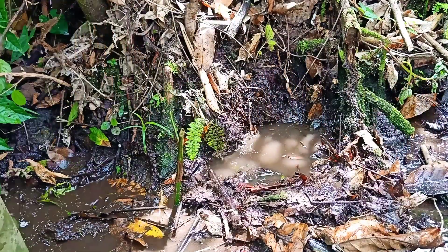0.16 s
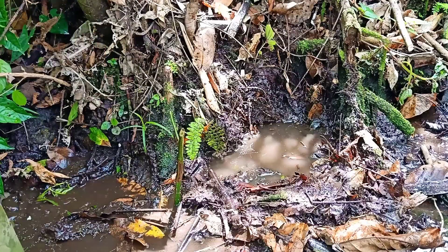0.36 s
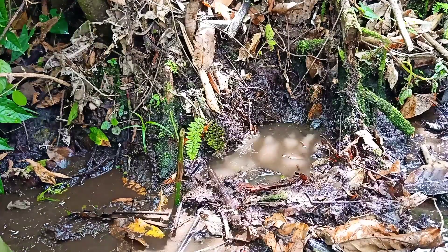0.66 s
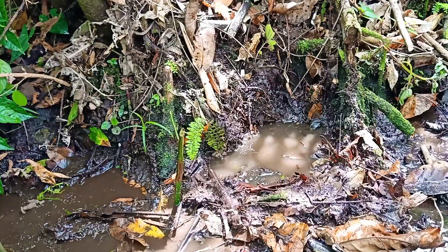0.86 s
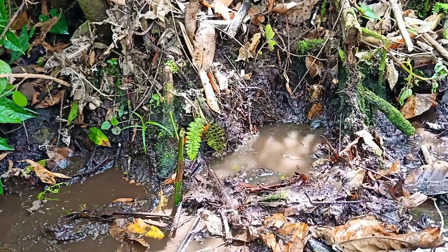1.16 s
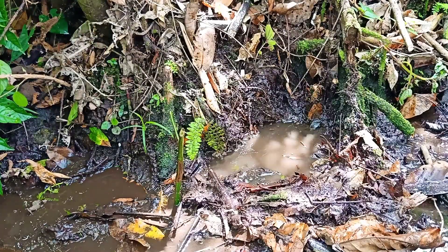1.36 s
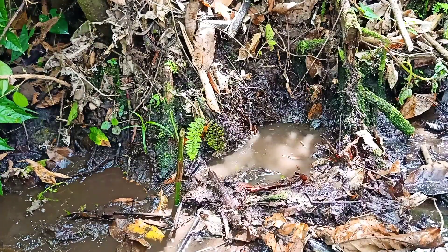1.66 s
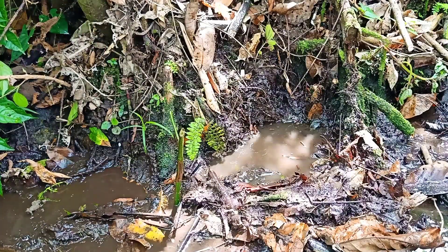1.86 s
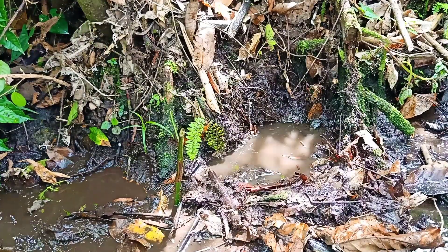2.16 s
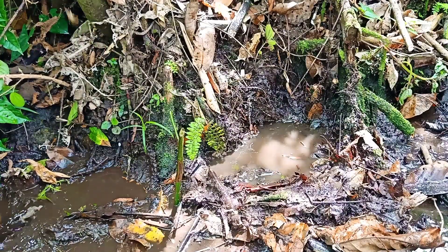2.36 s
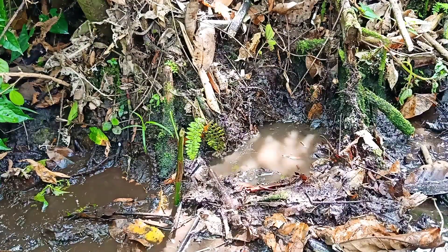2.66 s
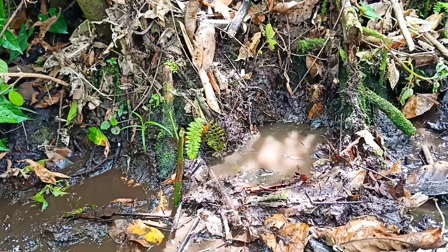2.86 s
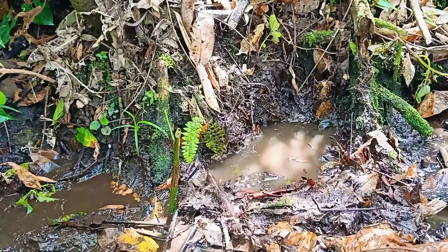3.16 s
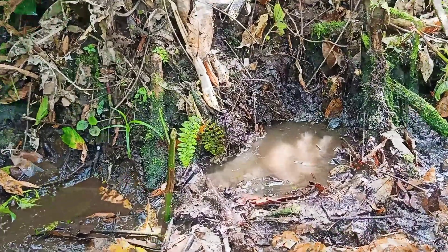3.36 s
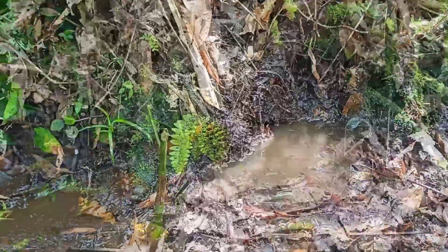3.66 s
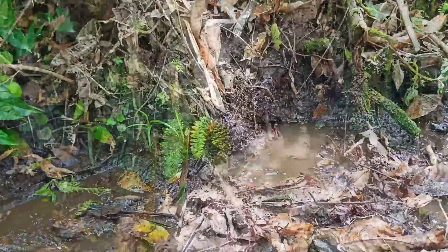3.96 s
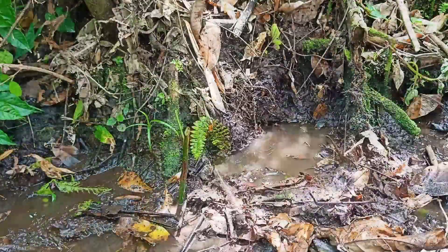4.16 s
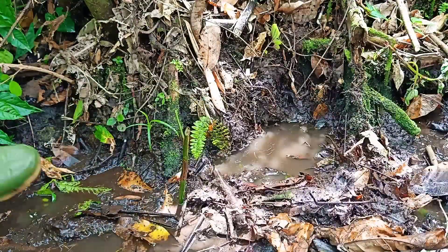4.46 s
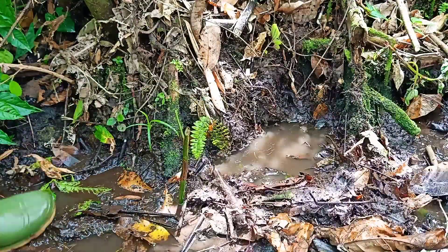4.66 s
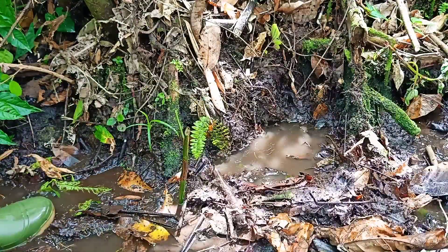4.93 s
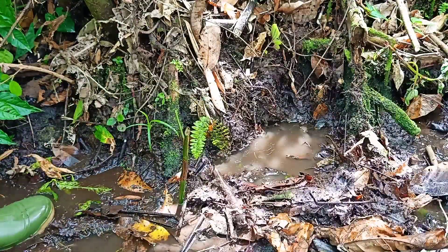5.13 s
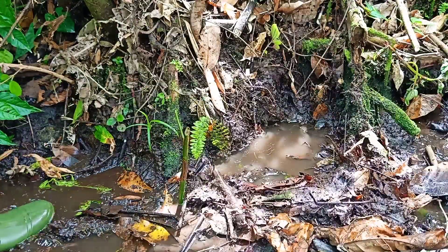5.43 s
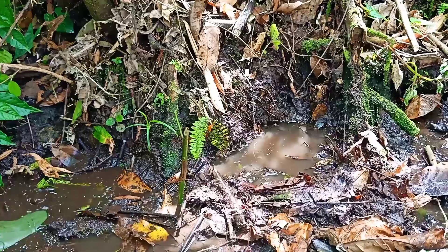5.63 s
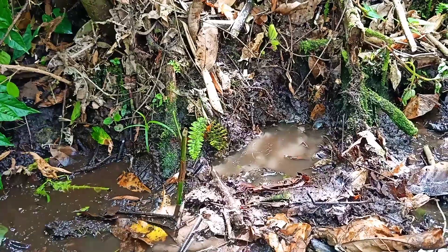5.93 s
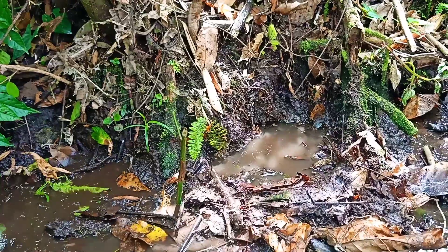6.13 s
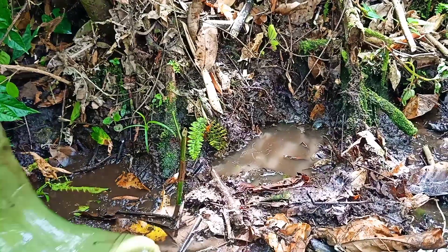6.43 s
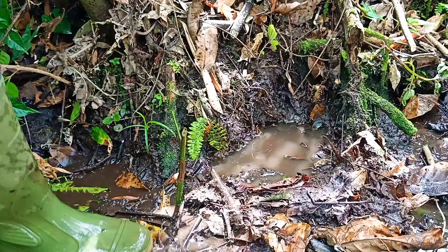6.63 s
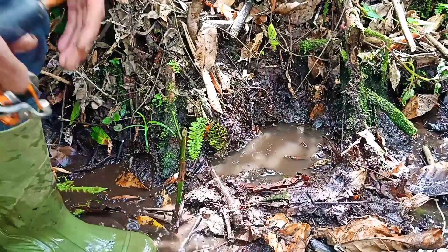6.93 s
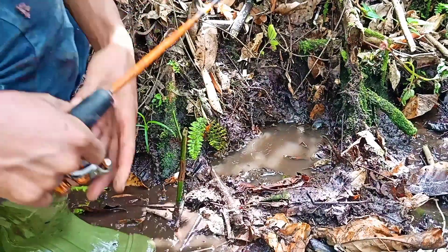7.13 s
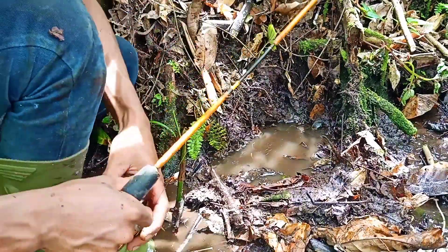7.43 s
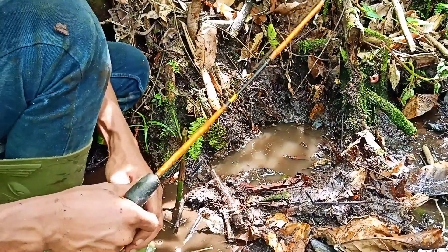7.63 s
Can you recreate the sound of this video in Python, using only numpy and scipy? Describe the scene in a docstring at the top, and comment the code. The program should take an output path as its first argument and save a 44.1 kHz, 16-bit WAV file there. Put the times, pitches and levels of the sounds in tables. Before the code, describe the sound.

A piercing, shimmering insect drone around 7 kHz fills both sides throughout, over a barely audible forest hush. From 0 to 0.4 s, close and slightly right, twigs snap and wet leaves rustle with a few plops. Around 0.8-1.6 s boots shuffle gently, mud gurgling and bubbling, with soft dull thuds. More squelches and snaps come near 1.9 s, then a thick stick breaks at 2.1 s with one loud, full crack. At 2.4 s a faint, quickly damped metallic clink mixes with sharp snaps. From about 3 to 5.8 s the footwork is sparse, only small rustles; the insects sink at 3.6 s and recover by 4.4 s. Faint hoarse whistles glide from the trees at 5-5.8 s. At 6-6.4 s water sloshes and plops amid brisk rustling; at 6.75-6.9 s comes a violent crunch of snapping twigs. Light rustles, ticks and soft thuds continue to 7.8 s.

```python
"""Boots in a swamp forest

Insects drone all round, built from noise and buzzing tones, over the faint hush of the trees.
Rubber boots shuffle on the right beside a water hole: tiny noise bursts rustle, slosh and squelch.
Twigs and a thick stick snap, a blade clinks, air pockets plop and soft ground thuds: short damped rings and bursts.
Faint gliding whistles arrive by way of the trees."""
import sys
import numpy as np
from scipy import signal
from scipy.fft import rfft, irfft, next_fast_len
from scipy.io import wavfile
from scipy.ndimage import uniform_filter1d, map_coordinates

SR = 44100
rng = np.random.default_rng(int(sys.argv[2]) if len(sys.argv) > 2 else 0)


def store_wav(level_fs):
    """Save 16-bit WAV to argv[1]."""
    pcm = np.round(np.clip(np.atleast_2d(level_fs), -1, 1) * 32767)
    wavfile.write(sys.argv[1], SR, pcm.T.astype(np.int16))


N = 343539

# how hard the boots work the litter over time: (start_s, effort_db)
EFFORT = [(0.0, -50), (0.5, -55.5), (1.54, -49), (1.67, -51.5), (1.89, -52), (2.02, -51.5), (2.65, -54),
          (3.38, -67), (3.86, -62), (3.99, -68), (4.36, -71), (4.53, -65.5), (5.16, -66), (5.9, -54),
          (6.05, -43), (6.25, -40.5), (6.38, -40), (6.72, -50), (6.92, -56), (7.15, -54.5), (7.5, -51.5),
          (7.79, -54)]
USUAL_DB = -51.5  # effort of an ordinary shuffle
# a middling twig: its pitch, and its woody body and sharp edge against the crack
TWIG_HZ, BODY_DB, EDGE_DB = 2475, -12, -6


def amp(db):
    """Turn decibels into a gain."""
    return 10 ** (np.asarray(db) / 20)


def unit(x):
    """Scale to an average strength (rms) of 1."""
    return x / np.sqrt(np.mean(x ** 2) + 1e-20)


def curves(rows):
    """Join the rows with straight lines: one value per sample for each column after the time."""
    s, *cols = np.transpose(rows)
    return [np.interp(np.arange(N) / SR, s, c) for c in cols]


def wobble(rate):
    """A smooth random curve through `rate` random points a second."""
    points = rng.standard_normal(int(N * rate / SR) + 4)
    return map_coordinates(points, [np.arange(N) * rate / SR])


def filtered(x, response):
    """Multiply the spectrum of x by a response that depends on frequency."""
    n = x.shape[-1]
    padded = 2 * next_fast_len(n // 2 + 2048)
    spectrum = rfft(x, padded) * response(np.fft.rfftfreq(padded, 1 / SR))
    return irfft(spectrum, padded)[..., :n]


def colour(x, points):
    """Shape the tone through (pitch_hz, level_db) points, with no sound ahead of its cause."""
    f, db = np.transpose(points)

    def response(hz):
        level_db = np.interp(np.log(hz + 1), np.log(f), db)
        # folding the cepstrum gives the filter that responds soonest (minimum phase)
        cepstrum = irfft(np.log(amp(level_db)))
        half = len(cepstrum) // 2
        cepstrum[1:half] *= 2
        cepstrum[half + 1:] = 0
        return np.exp(rfft(cepstrum))
    return filtered(x, response)


def add(track, s, sound):
    """Mix a sound into a track at time s."""
    start = max(round(s * SR), 0)
    part = sound[:max(N - start, 0)]
    track[start:start + len(part)] += part


def all_round(pair):
    """Sound from every side: the two ports agree only on waves longer than their spacing."""
    spacing_m, sound_speed = 0.25, 343  # speed in m/s
    alike = lambda hz: np.sinc(2 * hz * spacing_m / sound_speed)
    mid, side = filtered(pair, lambda hz: np.sqrt([1 + alike(hz), 1 - alike(hz)]))
    return np.array([mid + side, mid - side]) / 2


def from_right(x, lag_ms, right_db):
    """A near sound reaches the left port later, and weaker by right_db."""
    lag = lag_ms / 1000
    pair = filtered(x, lambda hz: np.exp(np.outer([-1, 1], 1j * np.pi * hz * lag)))
    return pair * amp([[-right_db / 2], [right_db / 2]])


def burst(spectrum, t60, kick=6):
    """A sudden kick and a short ragged tail through a resonance, with peak 1."""
    t = np.arange(SR // 20) / SR
    x = rng.standard_normal(len(t)) * amp(-60 * t / t60) * (1 - np.exp(-t / 0.00094))
    x[0] = kick
    x = colour(x, spectrum)
    return x / np.abs(x).max()


def undergrowth(x, near_db, near_t60, far_db, far_t60):
    """The bank and leaves scatter sound at once; the trunks answer faintly for longer."""
    t = np.arange(SR // 2) / SR

    def tail(t60):
        h = all_round(rng.standard_normal((2, len(t))))
        h = h * amp(-60 * t / t60) * (1 - np.exp(-t / 0.002))
        return unit(h) / np.sqrt(len(t))
    echo = amp(near_db) * tail(near_t60) + amp(far_db) * tail(far_t60)
    return signal.fftconvolve(x, echo, axes=1)[:, :N]


def insects():
    """Many tymbals blur into one shrill, shimmering band; a few nearer singers hold their pitches and buzz."""
    # the chorus swelling and sinking, ahead of a fixed lift: (start_s, level_db)
    chorus = [(0.0, -49), (2.75, -48.5), (3.6, -55), (4.14, -55.5), (4.36, -51), (5.9, -51), (6.2, -49.5),
              (7.79, -48.5)]
    # tone of the blurred band: (pitch_hz, level_db)
    drone = [(3410, -93), (5800, -10), (6150, -9), (6520, 6), (6840, 12), (7090, 5.5), (7420, -1),
             (7910, -7), (8250, -25), (8400, -110.5), (10900, -107), (18500, -120)]
    # nearer insects: (pitch_hz, level_db against the band,
    # right_db = right minus left before the whole chorus leans right, clicks_per_s on average)
    singers = [(6677, -12, 8, 81), (6755, -18, -2, 101), (6826, -17, 4, 81), (6946, -19, 5, 101)]
    throb_hz, throb_depth = 20.26, 0.096  # quick shimmer of the chorus
    buzz_depth = 0.42  # how deeply a singer's clicks pulse its tone
    t = np.arange(N) / SR

    def pulse(rate):
        wandering_rate = rate * (1 + 0.017 * wobble(2.8))
        return np.sin(2 * np.pi * np.cumsum(wandering_rate) / SR)

    buzz = 1 + 0.11 * pulse(81) + throb_depth * pulse(throb_hz)
    band = unit(colour(rng.standard_normal((2, N)), drone))
    band = band * buzz * amp(0.18 * wobble(18))
    for hz, db, right_db, clicks in singers:
        tone = np.sin(2 * np.pi * hz * t + 1.2 * wobble(28))
        voice = tone * amp(db + 2.5 * wobble(6)) * (1 + buzz_depth * pulse(clicks))
        band = band + voice * amp([[-right_db / 2], [right_db / 2]])
    # the tymbals' weak second harmonic, an octave above
    octave = unit(filtered(band ** 2, lambda hz: hz > 11000))
    level_db, = curves(chorus)
    return (band + amp(-33) * octave) * amp(level_db + 2.5) * amp([[-.8], [.8]])


def forest():
    """The faint, even hush of the trees, with a low rumble of air at each port."""
    # tone of the hush: (pitch_hz, level_db)
    hush_tone = [(25, -28.5), (60, -31), (130, -4.5), (330, -1.5), (600, -6.5), (950, -2.5), (1400, -2.5),
                 (2350, 4.5), (3600, -3.5), (5800, -11), (8000, -41), (9000, -46)]
    draught_tone = [(25, -14.5), (80, 4.0), (200, -2.0), (800, -64)]  # (pitch_hz, level_db)
    hush = unit(colour(all_round(rng.standard_normal((2, N))), hush_tone))
    draught = unit(colour(rng.standard_normal((2, N)), draught_tone))
    return amp(-65.0) * hush + amp(-73.5) * draught * amp([[-2], [2]])


def shuffle():
    """Gain of the rustle over time: almost nothing while the boots stand still."""
    still_db = -70.5  # the effort of standing still
    effort_db, = curves(EFFORT)
    return np.sqrt(np.maximum(amp(effort_db) ** 2 - amp(still_db) ** 2, 1e-12))


def swell(length, db):
    """One stroke of a sole or push of water: a smooth rise and fall."""
    return amp(db - 8.5) * signal.windows.hann(max(int(length * SR), 2))


def grains(rate, spread_db, clump_db, life):
    """Tiny contacts of uneven size, rate a second, that come in clumps; each is a brief burst."""
    size = np.clip(rng.standard_normal(N), -2, 2)
    hits = (rng.random(N) < rate / SR) * amp(2 * spread_db * size) / rate
    power = signal.lfilter([1], [1, -np.exp(-1 / (life * SR))], hits)
    return unit(np.sqrt(power) * amp(clump_db * wobble(55)) * rng.standard_normal(N))


def patchy(x, depth_db):
    """Cavities between the leaves open and close, so narrow resonances come and go."""
    z = signal.stft(x, nperseg=512)[2]
    field = uniform_filter1d(rng.standard_normal(z.shape[1:]), size=5, axis=0)
    field = uniform_filter1d(field, size=6, axis=1)
    return signal.istft(z * amp(depth_db * unit(field)), nperseg=512)[1][:, :N]


def litter(spectrum, rate, spread_db, clump_db, life, direct_db):
    """Grains heard partly straight from the boots, partly scattered by the undergrowth."""
    near, *far = [grains(rate, spread_db, clump_db, life) for _ in range(3)]
    direct = amp(direct_db) * from_right(near, lag_ms=0.377, right_db=4.0)
    pair = direct + all_round(np.array(far))
    return unit(colour(patchy(pair, depth_db=2.5), spectrum))


def bubbles(rate, centre_hz, spread, cycles, size_db):
    """Many small bubbles, rate a second, each a short ring of its own pitch."""
    t = np.arange(300) / SR
    when = np.flatnonzero(rng.random(N) < rate / SR)
    pitch, size = rng.standard_normal((len(when), 2)).T
    hz = np.minimum(centre_hz * np.exp(spread * pitch), 6000)
    phase = hz[:, None] * t  # counted in cycles
    envelope = phase * np.exp(-2 * np.pi * phase / cycles)
    rings = amp(size_db * np.minimum(size, 2))[:, None] * np.sin(2 * np.pi * phase) * envelope
    places = when[:, None] + np.arange(len(t))
    return unit(np.bincount(places.ravel(), rings.ravel(), N)[:N])


def footwork():
    """One effort rustles leaves, stirs water and works mud; scuffs swell all three, sloshes only the water."""
    # soles dragged through the litter, ahead of the swell's fixed cut:
    # (middle_s, length_s, level_db, wet_db = water and mud over leaves)
    scuffs = [(0.294, 0.075, -40, 7), (0.337, 0.076, -37, 2), (0.687, 0.14, -46.5, -5),
              (0.828, 0.1, -42.5, -7), (1.405, 0.26, -42.5, -9), (1.542, 0.15, -44.5, 1.5),
              (1.974, 0.085, -38.5, 2.5), (2.079, 0.21, -40, 0.5), (2.43, 0.066, -36, -28),
              (3.86, 0.12, -50, -9), (4.397, 0.16, -46.5, -5), (4.546, 0.29, -52.5, -33),
              (4.844, 0.27, -44.5, -5), (4.86, 0.1, -39, -16), (5.906, 0.1, -38, -6),
              (6.494, 0.11, -36, -23), (6.611, 0.11, -39.5, -8), (6.785, 0.11, -25.5, -10.5)]
    # water pushed aside, ahead of the same cut: (middle_s, length_s, level_db)
    sloshes = [(1.025, 0.021, -44), (1.073, 0.051, -44), (1.15, 0.05, -47), (2.433, 0.09, -42.5),
               (6.068, 0.15, -29), (6.192, 0.16, -36)]
    # tones of the leaves, water and mud: (pitch_hz, level_db)
    leaf_tone = [(700, -36.5), (1400, -9.5), (2000, -1), (2450, 0), (3200, -4.5), (4200, -8), (5800, -11),
                 (7200, -5.5), (8000, -26.5), (8900, -27), (11500, -28), (15500, -33)]
    water_tone = [(200, -30), (500, -16.5), (720, 1), (1000, 1), (1300, -0.5), (1700, -8), (3000, -33),
                  (6000, -74.5)]
    mud_tone = [(25, -32), (55, -33), (100, -9.5), (180, -2), (400, 1.5), (600, 1), (850, -5.5),
                (1500, -38), (6000, -69)]
    # gain in an ordinary shuffle, and dB gained per dB of effort
    water_db, water_grows = -57, 0.77
    mud_db, mud_grows = -57, 0.69

    leaves = shuffle()
    press = leaves / amp(USUAL_DB)
    water = amp(water_db) * press ** water_grows
    mud = amp(mud_db) * press ** mud_grows
    for s, length, db, wet_db in scuffs:
        for layer, layer_db in (leaves, db), (water, db + wet_db), (mud, db + wet_db):
            add(layer, s - length / 2, swell(length, layer_db))
    for s, length, db in sloshes:
        add(water, s - length / 2, swell(length, db))
    # the harder the push, the more leaves touch at once, until they merge into a swish
    crowd = np.sqrt(np.maximum(press, 1))
    rustle = amp(4.0) * litter(leaf_tone, rate=700 * crowd, spread_db=1.8, clump_db=1.6,
                               life=0.0014, direct_db=-7.5)
    slosh = amp(2.0) * litter(water_tone, rate=270, spread_db=1.0, clump_db=1.5,
                              life=0.0021, direct_db=-5.0)
    squelch = amp(-1.0) * litter(mud_tone, rate=470, spread_db=-0.5, clump_db=0.5,
                                 life=0.0021, direct_db=-2.5)
    # water squeezed out of the litter crackles and gurgles
    crackle = amp(-8.5) * bubbles(rate=130, centre_hz=2546, spread=0.245, cycles=8.4, size_db=2.0)
    gurgle = amp(-9.5) * bubbles(rate=70, centre_hz=967, spread=0.29, cycles=4.1, size_db=-4.0)
    wet = from_right(leaves * crackle + water * gurgle, lag_ms=0.25, right_db=0.0)
    ground = leaves * rustle + water * slosh + mud * squelch
    return wet + ground * amp([[-.7], [.7]])


def ticks():
    """Tiny breaks at random moments, stronger with the effort: rows like those of the snaps."""
    per_s, over_effort_db, scatter_db, scatter_octaves = 4, 5, 7.5, 0.25
    hard_grows = 0.65  # dB gained per dB of effort beyond an ordinary shuffle
    when = np.flatnonzero(rng.random(N) < per_s / SR)
    size, pitch = np.clip(rng.standard_normal((len(when), 2)), -2, 2).T
    effort_db = curves(EFFORT)[0][when]
    force_db = np.minimum(effort_db, USUAL_DB + hard_grows * (effort_db - USUAL_DB))
    level_db = force_db + over_effort_db + scatter_db * size
    pitch_hz = TWIG_HZ * 2 ** (scatter_octaves * pitch)
    return [(s, db, hz, BODY_DB, EDGE_DB) for s, db, hz in zip(when / SR, level_db, pitch_hz)]


def twigs():
    """Each break has a crack, a brief note at the twig's pitch, and its share of woody body and sharp edge."""
    # twigs and leaf ribs breaking, each heard 0.8 ms after its time:
    # (start_s, crack_peak_db, pitch_hz, body_db, edge_db; the last two against the crack)
    snaps = [(0.0074, -20, 3080, -24, -9), (0.0695, -26, 2920, -22, -5), (0.078, -26.5, 2400, -14, -14),
             (0.142, -26.5, 2700, -28, -20), (0.195, -35, 2680, -20, -10), (0.291, -32, 2620, -14, -10),
             (0.3314, -22, 2830, -14, 3), (0.346, -20.5, 1370, -10, 0), (0.817, -35, 2320, -9, 0),
             (1.018, -37.5, 2350, -14, -10), (1.1019, -31.5, 2260, -12, -12),
             (1.145, -32.5, 1680, -10, -12), (1.177, -34, 1500, -12, -10), (1.364, -24.5, 2260, -9, -1),
             (1.537, -29, 2400, -8, -10), (1.551, -29.5, 2300, -10, -7), (1.645, -30, 1850, -12, -10),
             (1.681, -34.5, 2280, -2, -6), (1.965, -22.5, 1990, -10, -2), (1.9789, -22.5, 2180, -8, -3),
             (2.142, -25.5, 2480, -18, -8), (2.161, -30.5, 2570, -12, 2), (2.383, -37, 2540, -20, -12),
             (2.3965, -22.5, 4000, -26, -4), (2.412, -26, 3500, -14, -5), (2.422, -30, 4200, -14, -5),
             (2.47, -32.5, 1900, -8, -14), (2.5036, -27, 1560, -5.5, -10), (2.734, -31, 2560, -6, -4),
             (2.9365, -32, 2700, -9, 2), (3.3997, -39.5, 2450, -19, -6), (3.8567, -31.5, 2240, -17, -8),
             (3.988, -36, 2170, -9.5, -8), (4.3462, -38.5, 5700, -14, 0), (5.3441, -35, 2670, -18, -14),
             (5.958, -28, 1510, -19, -6), (6.036, -23, 2810, -7, -0.5), (6.0568, -20, 4550, -18, -6),
             (6.08, -28.5, 3000, -7, -12.5), (6.112, -32, 5300, -20, -6), (6.132, -20.5, 3340, -10, -7),
             (6.161, -23, 3430, -10, -2), (6.2246, -24.5, 2740, -10, -4), (6.3559, -26, 2620, -12, -1),
             (6.488, -26, 2400, -16, -13), (6.583, -29, 2410, -14, -8), (6.7482, -18, 2370, -30, -28),
             (6.755, -10, 2380, -17, -12), (6.7592, -11.5, 1740, -7.5, 1.5),
             (6.7757, -8.5, 3250, -13.5, -2), (6.7795, -20, 2500, -13, 1), (6.7868, -12, 2220, -16, -12),
             (6.7965, -23, 2460, -18, -4), (6.808, -20.5, 2950, -18, -14), (6.8408, -22, 1890, -3.5, -22),
             (6.847, -25, 2100, -18, -20), (6.8638, -20.5, 5800, -20, 4.5), (7.11, -37, 1890, 1, -14),
             (7.139, -31.5, 1120, -11, -26), (7.214, -34, 2180, -6, -14), (7.236, -34, 1800, -4, -8),
             (7.275, -35.5, 1230, -14, -8), (7.449, -25.5, 2570, -4, -1), (7.7167, -25, 1420, -12, -11)]
    # tones of the woody body and the sharp edge: (pitch_hz, level_db)
    body_tone = [(60, -73), (180, -22), (330, -9.5), (750, 0), (1250, 4.5), (1700, -11.5), (4000, -28)]
    edge_tone = [(1000, -24), (2300, -21.5), (3500, 5), (4500, 0.5), (5300, -0.5), (6400, 8.5), (7400, -1),
                 (8200, -13.5), (9500, -47), (11500, -32.5), (15500, -41)]
    note_db, note_t60 = -9.5, 0.013  # a middling twig's note against its crack; 60 dB fade in s
    track, t = np.zeros(N), np.arange(SR // 20) / SR
    for s, db, hz, body_db, edge_db in snaps + ticks():
        crack_tone = [(hz / 20, -50), (hz / 4, -24), (hz * 0.8, -9), (hz, 0),
                      (hz * 1.2, -6), (hz * 1.75, -20), (hz * 6.1, -52)]
        crack = burst(crack_tone, t60=0.007, kick=2.73)
        # higher notes die sooner
        fade = amp(note_db - 60 * t / note_t60 * hz / TWIG_HZ) * (1 - np.exp(-t / 0.0004))
        note = fade * np.sin(2 * np.pi * hz * t)
        body = amp(body_db) * burst(body_tone, t60=0.014, kick=3.6)
        edge = amp(edge_db) * burst(edge_tone, t60=0.009, kick=2.06)
        add(track, s + .0008, amp(db) * (crack + note + body + edge))
    return from_right(track, lag_ms=0.388, right_db=3.0)


def pocket(hz):
    """One air pocket opens: a damped ring that rises in pitch, a weak upper resonance and a wet smack."""
    t60 = 0.03  # 60 dB fade, s
    t = np.arange(SR // 20) / SR
    phase = 2 * np.pi * hz * t * (1 + 3 * t)
    tone = np.sin(phase) + amp(-21) * np.sin(2.6 * phase)
    ring = tone * amp(-60 * t / t60) * (1 - np.exp(-t / 0.0008))
    mouth = [(hz / 20, -55), (hz / 4, -18), (hz, 0), (hz * 2.4, -8), (hz * 3.35, -18), (hz * 12, -52)]
    return ring + amp(-7.0) * burst(mouth, t60, kick=2.2)


def plops():
    """Air pockets open in mud and water, each trailed by a ragged few quieter ones."""
    # main pockets: (start_s, level_db, pitch_hz at the start of the rise)
    pockets = [(0.275, -31, 420), (0.298, -31.5, 645), (0.329, -25.5, 427), (0.345, -25.5, 1027),
               (0.891, -36.5, 620), (0.943, -34.5, 710), (1.002, -37, 770), (1.019, -27.5, 868),
               (1.057, -30, 876), (1.069, -31, 1226), (1.131, -31, 934), (1.143, -30.5, 1110),
               (1.261, -34.5, 570), (1.299, -36.5, 408), (1.32, -35, 344), (1.368, -31.5, 578),
               (1.406, -32, 487), (1.5, -37, 550), (1.523, -32, 382), (1.588, -38, 470), (1.853, -30, 886),
               (1.871, -27, 1315), (1.92, -32, 487), (1.963, -30.5, 613), (2.024, -31.5, 460),
               (2.095, -29.5, 350), (2.332, -36, 4980), (2.573, -41.5, 307), (2.727, -43, 650),
               (2.822, -39.5, 1780), (2.937, -39.5, 435), (2.955, -41.5, 730), (5.344, -43.5, 810),
               (6.037, -24.5, 1054), (6.052, -27, 905), (6.068, -30, 784), (6.083, -22, 985),
               (6.128, -25.5, 1037), (6.16, -30, 1400), (6.183, -29.5, 700), (6.234, -24.5, 1330),
               (6.366, -29, 940), (6.7305, -27.5, 526), (6.851, -32, 1166), (7.139, -44, 644),
               (7.355, -32, 850), (7.37, -35.5, 960), (7.373, -35.5, 475)]
    trail_s, trail_db, trail_octaves = 0.012, -12, 0.3  # longest delay, level, pitch scatter
    track = np.zeros(N)
    for s, db, hz in pockets:
        add(track, s, amp(db) * pocket(hz))
        for delay, pitch in rng.random(size=(3, 2)):
            trail_hz = hz * 2 ** (trail_octaves * (2 * pitch - .5))
            add(track, s + trail_s * delay, amp(db + trail_db) * pocket(trail_hz))
    return from_right(track, lag_ms=0.19, right_db=0.5)


def thuds():
    """Soft ground takes each shift of weight with a dull bump."""
    # weight landing, ahead of a fixed 4 dB cut: (start_s, level_db)
    landings = [(0.887, -36), (1.259, -31), (1.304, -48.5), (1.41, -35), (1.549, -36.5), (1.96, -38),
                (2.042, -36), (3.633, -49), (3.881, -46), (5.951, -42), (6.003, -39), (6.538, -36),
                (6.729, -39.5), (7.38, -38), (7.46, -35), (7.525, -38), (7.678, -41)]
    # tone of the soft ground: (pitch_hz, level_db)
    ground_tone = [(25, -32), (60, -21), (100, -6.5), (180, 1), (280, -3), (600, -10), (2000, -48)]
    track = np.zeros(N)
    for s, db in landings:
        add(track, s, amp(db - 4.0) * burst(ground_tone, t60=0.1))
    return from_right(track, lag_ms=0.23, right_db=3.0)


def stick():
    """The fibres of a thick stick part within a few milliseconds: one loud, full crack."""
    # the stages of the break: (start_s, peak_db, t60_s = time to fade by 60 dB)
    stages = [(2.1048, -5.5, 0.0055), (2.1058, -8.5, 0.0083), (2.1083, -13.5, 0.0042)]
    # tone of the stick: (pitch_hz, level_db)
    stick_tone = [(40, -41), (150, -28.5), (320, -6), (560, -6), (800, -4.5), (1000, -2), (1300, 2),
                  (1600, -9), (2330, 4), (3000, -13.5), (3700, -10), (4500, -12.5), (5300, -18),
                  (6500, -3.5), (7600, -21.5), (9000, -32), (14000, -40)]
    track = np.zeros(N)
    for s, db, t60 in stages:
        add(track, s, amp(db) * burst(stick_tone, t60, kick=1.5))
    return from_right(track, lag_ms=0.398, right_db=4.0)


def clinks():
    """Something hard, perhaps a steel blade, grazes a stem and rings anew; the hand damps it quickly."""
    # touches, ahead of a fixed 2 dB cut: (start_s, level_db)
    touches = [(2.396, -28), (2.411, -23.5), (2.421, -30)]
    # the blade's ways of ringing: (pitch_hz, level_db before a random scatter, t60_s = 60 dB fade)
    modes = [(825, -5.5, 0.1), (1130, -10, 0.073), (1537, 0, 0.034), (2470, 1, 0.1), (3960, 3, 0.06),
             (4120, 4, 0.041), (4565, -5, 0.044)]
    track, t = np.zeros(N), np.arange(SR // 5) / SR
    for s, db in touches:
        ring = np.zeros(len(t))
        for hz, level, t60 in modes:
            fade = amp(level + rng.normal(0, 2.1) - 60 * t / t60)
            ring += fade * np.sin(2 * np.pi * (hz * t + rng.random()))
        ring = ring * (1 - np.exp(-t / 0.0004))
        add(track, s, amp(db - 2.0) * ring / np.abs(ring).max())
    return from_right(track, lag_ms=0.4, right_db=7.0)


def whistles():
    """Faint, hoarse gliding notes, like a far bird, that arrive only by way of the trees."""
    # slurred notes before the trees scatter them: (start_s, length_s, start_hz, end_hz, level_db)
    notes = [(4.94, 0.13, 3130, 3170, -67), (5.03, 0.1, 2350, 2070, -59), (5.153, 0.096, 2610, 1920, -57.5),
             (5.44, 0.22, 2475, 2200, -59.5), (5.66, 0.12, 2140, 2310, -62)]
    hoarseness = 1.1  # random shake of the phase, radians
    track = np.zeros(N)
    for s, length, start_hz, end_hz, db in notes:
        n = int(length * SR)
        glide = 2 * np.pi * np.cumsum(np.linspace(start_hz, end_hz, n)) / SR
        note = np.sin(glide + hoarseness * wobble(490)[:n])
        add(track, s, amp(db) * note * signal.windows.tukey(n, .5))
    return undergrowth(track[None], near_db=3.0, near_t60=0.043, far_db=-2.5, far_t60=0.38)


def scene():
    """Near sounds, each with its own scatter, are mixed with the footwork, the insects and the trees."""
    near = sum(x + undergrowth(x, near_db=-6.5, near_t60=0.057, far_db=-13.0, far_t60=0.22)
               for x in (twigs(), clinks(), plops(), thuds()))
    crack = stick()
    crack = crack + undergrowth(crack, near_db=-4.5, near_t60=0.048, far_db=-11.0, far_t60=0.26)
    return near + crack + footwork() + insects() + forest() + whistles()


def record(dry):
    """Deep bass is cut, a band around 9 to 10.5 kHz is dipped by 8 dB, and nothing from top_hz up passes."""
    top_hz = 15700
    low_cut = lambda hz: (1j * hz / (1j * hz + 28)) ** 2
    treble_dip = lambda hz: amp(np.interp(hz, [8000, 9000, 10500, 11500], [0, -8, -8, -1]))
    return filtered(dry, lambda hz: low_cut(hz) * treble_dip(hz) * (hz < top_hz))


dry = scene()
out = record(dry)
store_wav(out)
```